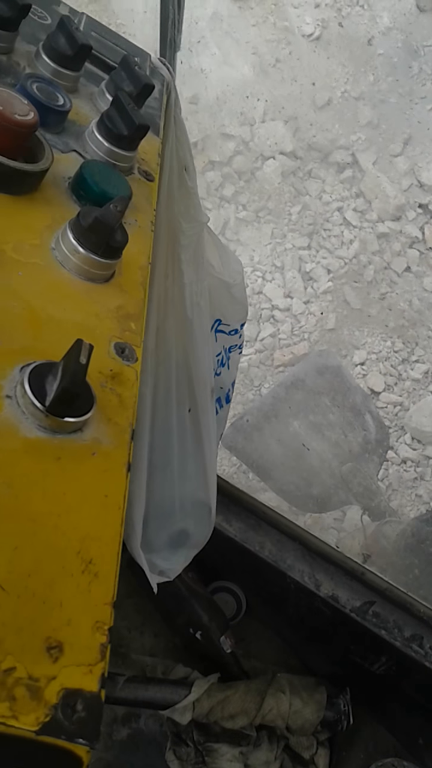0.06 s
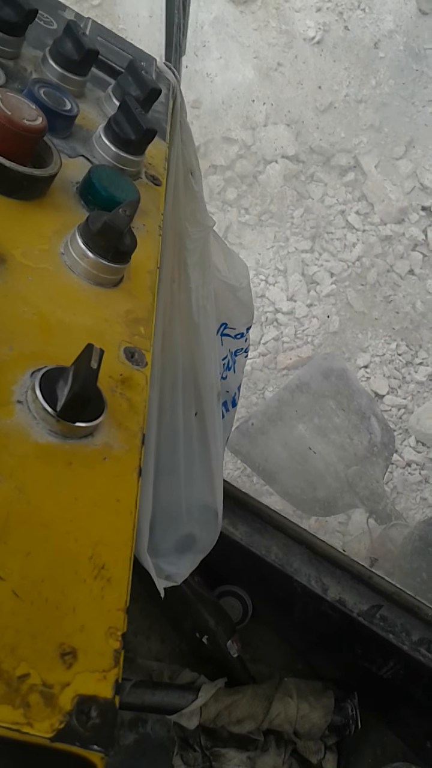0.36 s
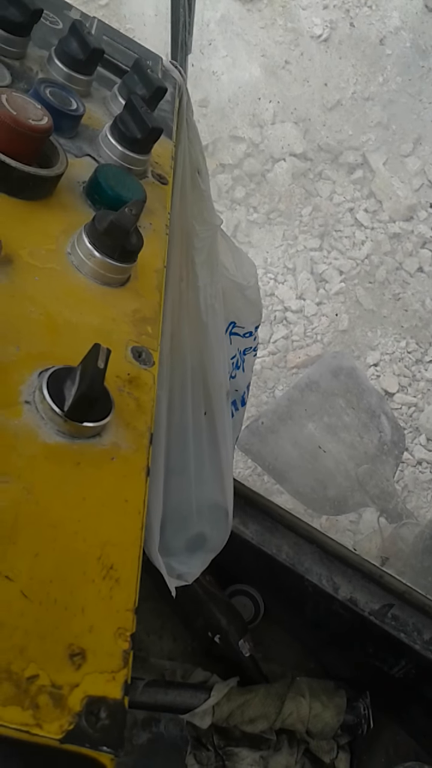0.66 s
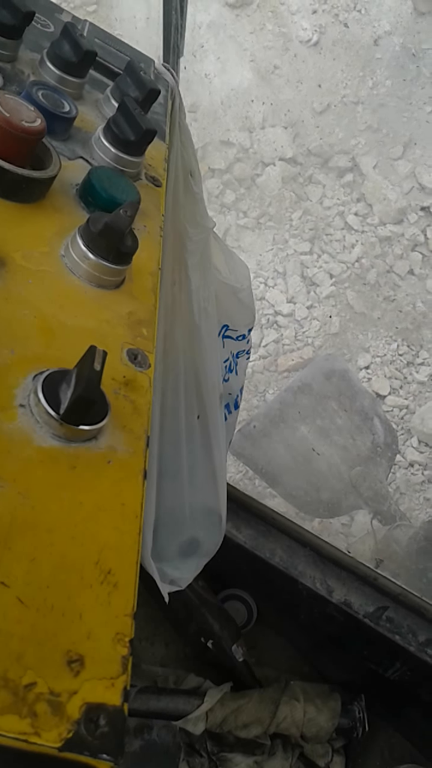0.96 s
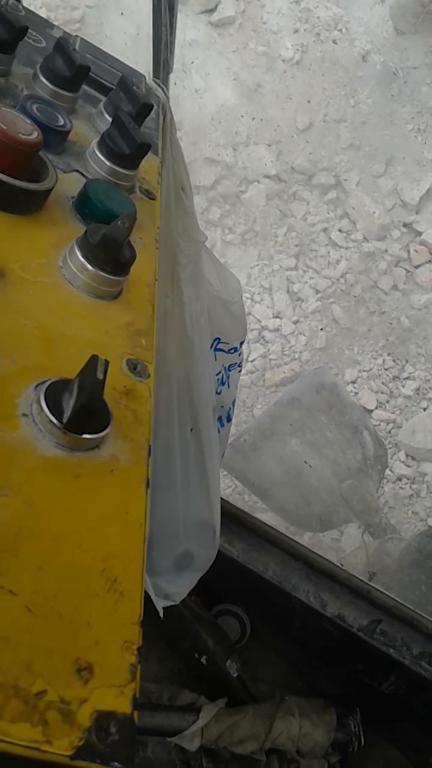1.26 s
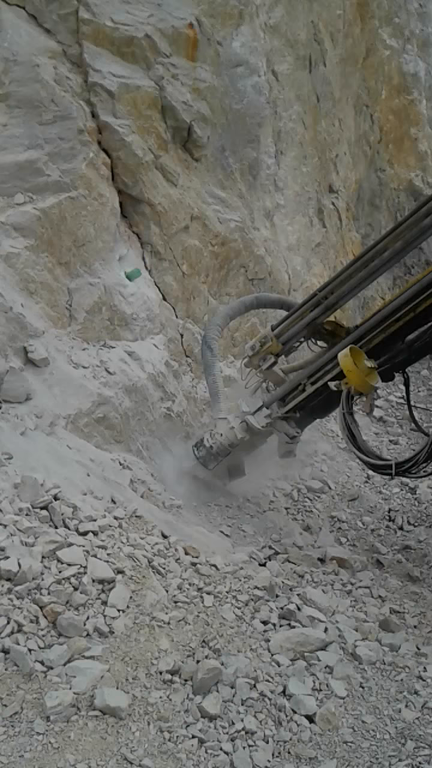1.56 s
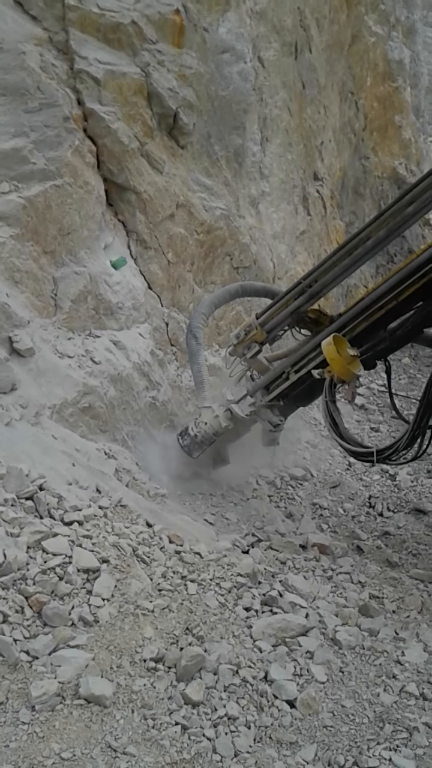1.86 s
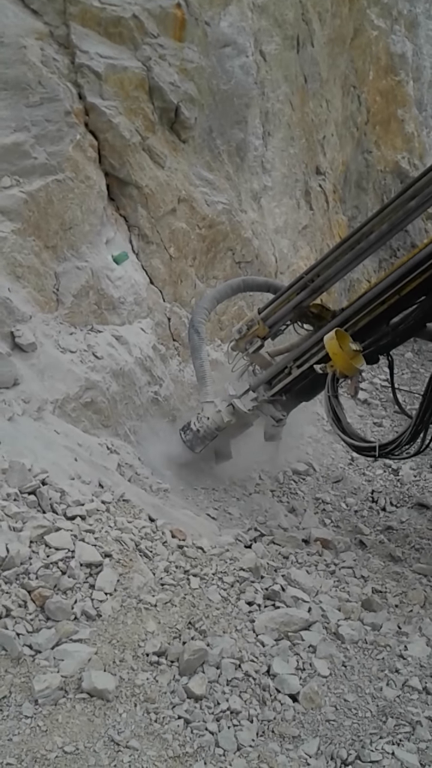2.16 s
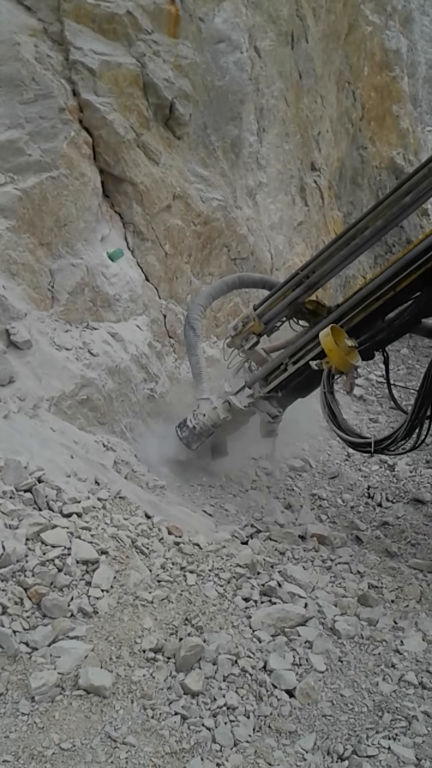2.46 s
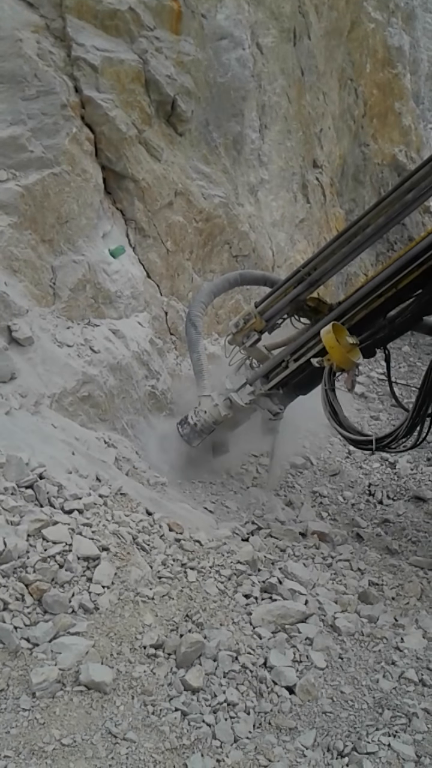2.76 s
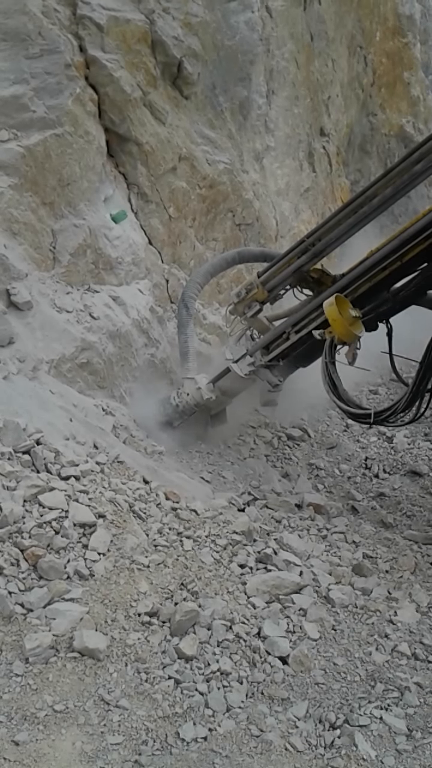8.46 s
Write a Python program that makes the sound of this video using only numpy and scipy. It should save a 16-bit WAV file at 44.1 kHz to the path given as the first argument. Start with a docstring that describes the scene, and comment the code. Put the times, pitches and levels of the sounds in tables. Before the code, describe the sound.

Close to a rock drilling rig in a quarry, a diesel engine hums alone for a moment. Then loud, fast hammering suddenly takes over: steel clatters and rings, the bit scrapes the stone and a dust hose roars. The blows quicken and the engine sags slightly under the load. Past the middle, the metallic tone shifts and the drilling carries on, with a few soft wind thumps on the microphone.

```python
"""A crawler drill rig in a quarry, heard close up on one microphone at its control stand.
The diesel idles alone. At 1.6 s the hydraulic hammer starts: some thirty blows a second knock the housing,
rattle the couplings and ring the steel rod. The bit clanks and grinds on the rock, the dust suction roars,
the diesel sags under the load and a limiter holds the level down. By 4 s the hammer is at full speed.
Near 4.9 s the bit seats in the hole and the ring changes; after that, low gusts buffet the microphone."""
import sys
import numpy as np
from scipy import signal
from scipy.fft import rfft, irfft, next_fast_len
from scipy.io import wavfile
from scipy.ndimage import uniform_filter1d

SR = 44100
rng = np.random.default_rng(int(sys.argv[2]) if len(sys.argv) > 2 else 0)


def wav_out(sig):
    """Save sig, one row per channel (or a flat mono array), as 16-bit PCM at SR to the path in sys.argv[1]."""
    wavfile.write(sys.argv[1], SR, np.round(np.clip(np.atleast_2d(sig).T, -1, 1) * 32767).astype(np.int16))


N = 374850
TIME = np.arange(N) / SR
START_S, SEAT_S = 1.642, 4.88   # the hammer starts; the bit finds its seat


def from_db(db):
    """Decibels to gain."""
    return 10 ** (np.asarray(db) / 20)


def rms_one(x):
    """Scale to an rms of 1."""
    return x / np.sqrt(np.mean(x ** 2) + 1e-20)


def colour(x, spectrum):
    """Shape a sound by a smooth spectrum; rms 1."""
    hz, db = np.transpose(spectrum)
    size = next_fast_len(N + SR // 10)
    bins_hz = np.maximum(np.arange(size // 2 + 1) * SR / size, 1)
    gain = from_db(np.interp(np.log(bins_hz), np.log(hz), db))
    return rms_one(irfft(rfft(x, size) * gain, size)[:N])


def noise(spectrum):
    """Steady noise of a given colour; rms 1."""
    return colour(rng.standard_normal(N), spectrum)


def drift(per_s):
    """A slow random wander with a spread of about 1."""
    return np.interp(TIME * per_s, np.arange(1000), rng.standard_normal(1000))


def resonate(x, modes, damping=1, wander_db=0):
    """Parallel resonances of alternating sign, each base width multiplied by damping; rms 1."""
    out = np.zeros(N)
    for k, (hz, width, db) in enumerate(modes):
        r = np.exp(-np.pi * width * damping / SR)
        poles = [1, -2 * r * np.cos(2 * np.pi * hz / SR), r * r]
        mode = (1 - r * r) / 2 * signal.lfilter([1, 0, -1], poles, x + 1e-18)
        out += (-1) ** k * from_db(db + wander_db * drift(9)) * mode
    return rms_one(out)


def engine_speed(idle_hz=74.8, sag_hz=10.25, lag_s=.13, full_blows_per_s=32.5):
    """Firings per second: the flywheel gives way to the hammer's load with a short lag."""
    load = (hammer_speed() / full_blows_per_s) ** 1.8
    inertia = np.exp(-1 / (lag_s * SR))
    return idle_hz - sag_hz * signal.lfilter([1 - inertia], [1, -inertia], load)


# engine and pump tones: multiple_of_firing_rate, level_db
ENGINE_TONES = [(1, -36.5), (4 / 3, -49), (5 / 3, -43), (2, -37.5), (3, -39.5), (3.7, -47), (4.5, -47),
                (7.92, -53), (16, -60)]
# engine rumble and cooling fan: frequency_hz, relative_db
RUMBLE_SPECTRUM = [(20, -27), (48, -7), (105, -1.5), (175, -5.5), (215, 1), (290, -3.5), (450, -10),
                   (750, -18.5), (1200, -21.5), (1950, -33), (2620, -27.5), (3300, -37), (5800, -29.5),
                   (10000, -38.5)]
def diesel():
    """Firing and pump tones hum over a rumble that pulses with the cylinders."""
    phase = 2 * np.pi * np.cumsum(engine_speed() * (1 + .0015 * drift(7))) / SR
    tones = np.zeros(N)
    for multiple, db in ENGINE_TONES:
        amplitude = np.sqrt(2) * from_db(db + .69 * drift(9))
        tones += amplitude * np.sin(multiple * phase + 2 * np.pi * rng.random())
    rumble = from_db(-35 + 1.5 * drift(8.1)) * noise(RUMBLE_SPECTRUM)
    return tones + rumble * (1 + .1 * np.cos(phase))


# gusts on the microphone: peak_s, spread_s, level_db
GUSTS = [(1.503, 0.033, -45), (5.86, .05, -22), (6.206, 0.043, -19.5), (6.524, 0.037, -22),
         (6.717, 0.026, -17), (6.99, .03, -30), (7.646, 0.044, -16), (7.98, 0.028, -24)]
# their low thud: frequency_hz, relative_db
GUST_SPECTRUM = [(25, -37), (70, 0), (140, 10.5), (270, 8), (420, -12), (1500, -55)]
def buffets():
    """Air buffets the microphone in brief low swells, the first very faint."""
    swell = sum(from_db(db) * np.exp(-.5 * ((TIME - s) / spread) ** 2) for s, spread, db in GUSTS)
    return swell * noise(GUST_SPECTRUM)


# the hammer's pace: time_s, blows_per_s
HAMMER_PACE = [(1.642, 30.73), (1.809, 26.8), (3.002, 27.05), (3.587, 26.14), (3.787, 30.45),
               (4.045, 32.58), (6.72, 32.71), (7.764, 31.96), (8.5, 32.24)]
def hammer_speed():
    """Blows per second: none at idle, slow for collaring the hole, then full power."""
    return np.interp(TIME, *np.transpose(HAMMER_PACE)) * (TIME > START_S)


def piston(jitter_s=.00005):
    """The samples at which the piston lands, a little uneven."""
    strokes = np.cumsum(hammer_speed()) / SR
    blows = np.flatnonzero(np.diff(np.ceil(strokes)))
    jitter = (jitter_s * SR * rng.standard_normal(len(blows))).astype(int)
    return np.clip(blows + jitter, 0, N - 1)


def feed_db(peak_s=4.37, rise_db_per_s=2, ease_db=7.5, ease_s=2.4):
    """Force on the bit about its mean: fed ever harder against the rock, then eased off as it goes in."""
    rising = rise_db_per_s * np.minimum(TIME - peak_s, 0)
    easing = ease_db * (1 - np.exp(-np.maximum(TIME - peak_s, 0) / ease_s))
    db = rising - easing
    return db - db[TIME > START_S].mean()


def seating(spread_s=.054):
    """From 0, the bit loose on the surface, to 1, seated in the hole."""
    return .5 + .5 * np.tanh((TIME - SEAT_S) / (2 * spread_s))


def as_bit_seats(loose, seated):
    """Equal-power fade from the loose sound to the seated one."""
    share = seating()
    return np.sqrt(1 - share) * loose + np.sqrt(share) * seated


# the few blows that bite harder or softer: time_s, extra_db_at_bite_1
ODD_BLOWS = [(2.301, 3), (2.931, 0.5), (3.042, 3), (3.266, -3), (3.68, 1), (4.252, -3), (5.294, 2),
             (7.441, 6.5), (8.159, 2)]
def strikes(blows, spread_db, bite):
    """One click a blow, more uneven while the bit is loose; bite scales the odd blows' extra level."""
    skating = 1 + .16 * (1 - seating()[blows])
    db = spread_db * skating * rng.standard_normal(len(blows))
    for s, extra_db in ODD_BLOWS:
        db[np.argmin(abs(blows / SR - s))] += bite * extra_db
    clicks = np.zeros(N)
    clicks[blows] = from_db(db)
    return clicks


def rattle(clicks, rise_s, fade_s, alike, grain_db):
    """Each blow sets off a dying burst of tiny contacts; the share alike repeats from blow to blow."""
    age = TIME[:SR // 8]
    shape = (1 - np.exp(-age / rise_s)) * np.exp(-age / fade_s)
    repeating = signal.oaconvolve(clicks, shape * rng.standard_normal(len(age)))[:N]
    power = np.maximum(signal.oaconvolve(clicks ** 2, shape ** 2)[:N], 0)
    grains = np.repeat(from_db(grain_db * rng.standard_normal(N // 32 + 1)), 32)[:N]
    contacts = np.sqrt(power) * rms_one(rng.standard_normal(N) * grains)
    return np.sqrt(alike) * repeating + np.sqrt(1 - alike) * contacts


# hammer housing resonances: pitch_hz, width_hz, relative_db
HOUSING_MODES = [(655, 35, -6), (720, 60, -6), (860, 140, -14), (1030, 110, -8), (1110, 85, 1),
                 (1190, 150, -9)]
def housing_knock(blows):
    """The housing takes a hard shove a millisecond after each landing, then a weaker shudder."""
    shove = np.roll(strikes(blows, spread_db=1.2, bite=.4), SR // 1000)
    shudder = rattle(shove, rise_s=.0045, fade_s=.047, alike=.17, grain_db=-5)
    force = rms_one(shove) + from_db(-5.5) * rms_one(shudder)
    return from_db(-28.5 + feed_db()) * resonate(force, HOUSING_MODES)


# couplings and guides, bit loose and bit seated: frequency_hz, relative_db
LOOSE_CLATTER_SPECTRUM = [(500, -30), (700, -10.5), (1450, -6.5), (1950, -1), (2350, 1), (3300, -4.5),
                          (3600, -5.5), (4700, -4), (5300, 2.5), (5750, -0.5), (6400, -7), (8200, -22.5),
                          (10500, -24), (15000, -37)]
SEATED_CLATTER_SPECTRUM = [(600, -17), (1250, -2.5), (1700, -13), (2200, 1.5), (2700, 5.5), (3900, 1),
                           (4750, -1), (5400, 6), (6500, -8.5), (7100, -5), (8100, -28.5), (9700, -11.5),
                           (11000, -20), (15000, -37)]
def coupling_clatter(blows):
    """The couplings chatter for most of each stroke."""
    clicks = strikes(blows, spread_db=.6, bite=.5)
    chatter = rattle(clicks, rise_s=.0018, fade_s=.022, alike=.2, grain_db=2.5)
    loose = from_db(-17.5) * colour(chatter, LOOSE_CLATTER_SPECTRUM)
    seated = from_db(-19.24) * colour(chatter, SEATED_CLATTER_SPECTRUM)
    return as_bit_seats(loose, seated)


# how strongly a blow drives the rod: frequency_hz, relative_db
STRESS_SPECTRUM = [(3400, 3), (4000, 0), (4600, 4.5), (5200, 3.5), (5550, 4), (5900, 4.5), (6600, 2.5),
                   (8000, 4)]
# rod resonances, bit loose and bit seated: pitch_hz, base_width_hz, relative_db
LOOSE_ROD_MODES = [(3670, 49, -9), (4590, 37, -5), (4910, 46, -4), (5249, 60, -5), (5530, 81, 0),
                   (5860, 34, -2), (6520, 37, -12), (7220, 68, -17), (7910, 57, -20), (8600, 55, -25)]
SEATED_ROD_MODES = [(3420, 61, 0), (3940, 230, -7), (4290, 62, -8), (4610, 41, -4), (4890, 34, -6),
                    (5200, 42, 0), (5530, 40, -2), (5880, 40, -3), (6170, 26, -9), (6520, 45, -13),
                    (6850, 62, -12), (7560, 53, -20), (7910, 74, -24), (8240, 41, -24), (8590, 53, -25)]
def rod_ring(blows):
    """A stress wave runs up and down the steel rod and rings on into the next blow."""
    clicks = strikes(blows, spread_db=1.85, bite=.057)
    bursts = rattle(clicks, rise_s=.00049, fade_s=.022, alike=.033, grain_db=1.5)
    stress = colour(bursts, STRESS_SPECTRUM)
    loose = from_db(-21) * resonate(stress, LOOSE_ROD_MODES, damping=.38, wander_db=1.2)
    seated = from_db(-18.5) * resonate(stress, SEATED_ROD_MODES, damping=.71, wander_db=.8)
    return as_bit_seats(loose, seated)


# bright resonances of steel on steel: pitch_hz, width_hz, relative_db
CRACK_MODES = [(9190, 190, -0.5), (9920, 270, -2.5), (12300, 700, -11.5)]
def piston_crack(blows):
    """The piston face cracks against the shank."""
    clicks = strikes(blows, spread_db=1.8, bite=.24)
    contact = rattle(clicks, rise_s=.00078, fade_s=.014, alike=.1, grain_db=-1.5)
    return from_db(-39) * resonate(contact, CRACK_MODES)


# the bit on the rock, loose and seated: pitch_hz, base_width_hz, relative_db
LOOSE_BIT_MODES = [(1720, 160, -13), (1950, 120, -7), (2105, 60, -5), (2320, 100, 1), (2460, 100, -7),
                   (2985, 90, -6), (3290, 120, -8)]
SEATED_BIT_MODES = [(2600, 160, -7), (2950, 200, -6), (3230, 110, -1), (3420, 70, 0)]
def bit_clank(blows, feed_share=.31, surge_s=.6):
    """The bit meets new rock each time, so its clanks are short and uneven."""
    clicks = strikes(blows, spread_db=1.6, bite=1.15)
    crush = rattle(clicks, rise_s=.0075, fade_s=.0064, alike=.077, grain_db=2)
    surge_db = np.exp(-np.maximum(TIME - SEAT_S, 0) / surge_s)   # 1 dB extra as it drops into its seat
    loose = from_db(-22.43) * resonate(crush, LOOSE_BIT_MODES, damping=.68)
    seated = from_db(-26 + surge_db) * resonate(crush, SEATED_BIT_MODES, damping=.73)
    return from_db(feed_share * feed_db()) * as_bit_seats(loose, seated)


# steel scraping rock: frequency_hz, relative_db
GRIND_SPECTRUM = [(500, -38), (1100, -11.5), (1600, -10), (2350, -3.5), (4300, -7), (5000, -5.5),
                  (5500, -0.5), (6400, -10.5), (8200, -18), (9800, -19), (15000, -46)]
def grinding(fresh_db=12.5, settle_s=3.7):
    """The turning bit scrapes the rock, loud at first and dying down as it cuts a cup for itself."""
    fresh = np.exp(-np.maximum(TIME - START_S, 0) / settle_s)
    level_db = -32.5 + fresh_db * fresh + .44 * drift(40)
    return (TIME > START_S) * from_db(level_db) * noise(GRIND_SPECTRUM)


# the roar of the dust hose: frequency_hz, relative_db
SUCTION_SPECTRUM = [(25, -56), (70, -12), (120, -8), (270, -1), (450, -0.5), (580, -8), (900, -0.5),
                    (1600, -9.5), (6000, -20.5), (15000, -29)]
def suction():
    """Air and crushed rock rush up the dust hose while the drill works."""
    running = np.clip((TIME - START_S) / .02, 0, 1)
    return running * from_db(-30 + .5 * drift(12)) * noise(SUCTION_SPECTRUM)


def scene(drill_gain_db=14.5):
    """The rig in mono from its control stand, the drilling far louder than the engine."""
    background = diesel() + buffets()
    blows = piston()
    parts = (housing_knock, coupling_clatter, rod_ring, piston_crack, bit_clank)
    hammering = sum(part(blows) for part in parts)
    drilling = hammering + grinding() + suction()
    return (background + from_db(drill_gain_db) * drilling)[None]


def limiter(x, ceiling_db, release_db_per_s, window_s):
    """The gain drops just ahead of loud sound and creeps back between blows."""
    size = int(window_s * SR)
    level_db = 10 * np.log10(np.maximum(uniform_filter1d(x[0] ** 2, size), 1e-12))
    over_db = np.maximum(level_db - ceiling_db, 0)
    release_db = release_db_per_s * TIME
    held_db = np.maximum.accumulate(over_db + release_db) - release_db
    return x * from_db(-uniform_filter1d(held_db, size))


def record(dry):
    """After the microphone: a limiter, rounded peaks and a steep top cut at 15.1 kHz."""
    limited = limiter(dry, ceiling_db=-9.5, release_db_per_s=69.5, window_s=.005)
    rounded = 1.477 * np.tanh(limited / 1.728)
    top_cut = signal.ellip(12, .1, 90, 15100, fs=SR, output="sos")
    return signal.sosfilt(top_cut, rounded)


dry = scene()
out = record(dry)
wav_out(out)
```